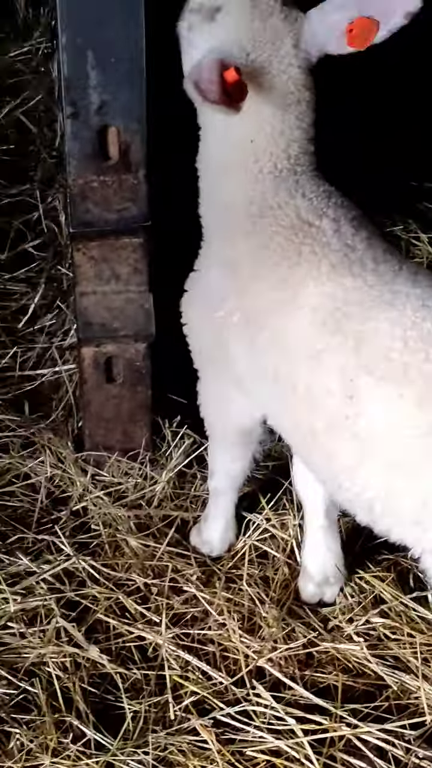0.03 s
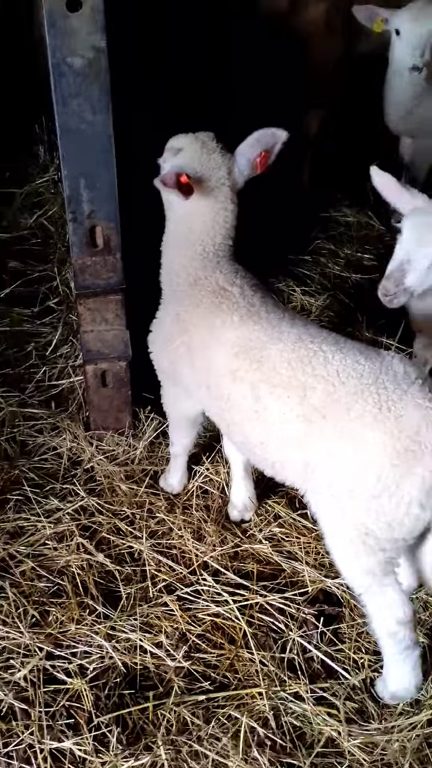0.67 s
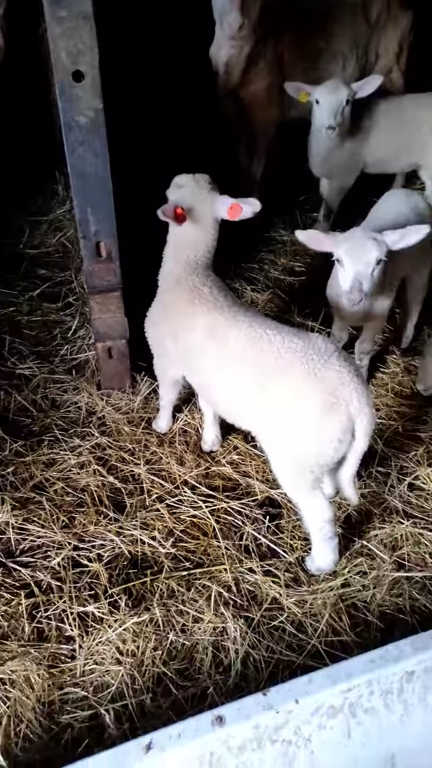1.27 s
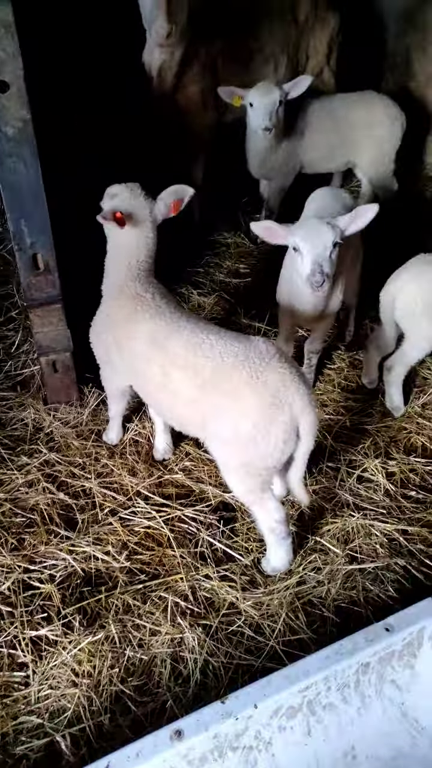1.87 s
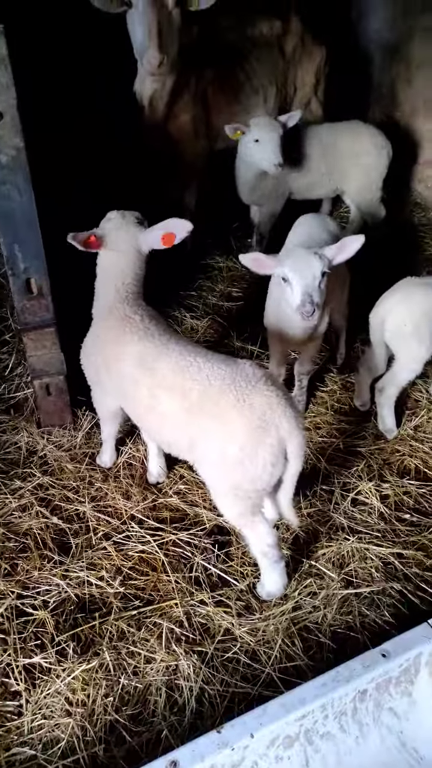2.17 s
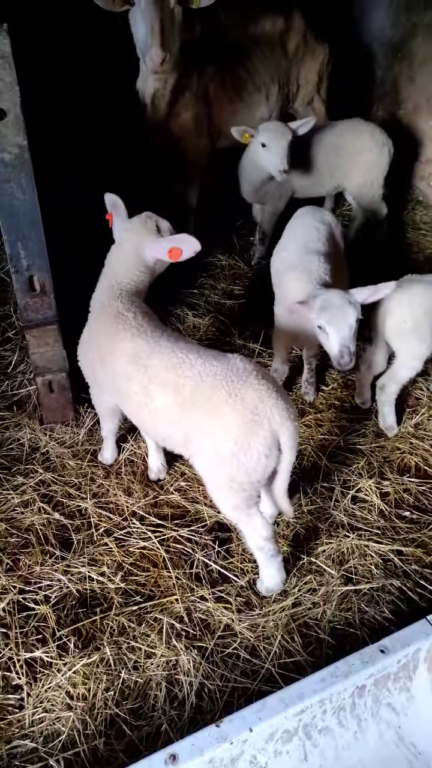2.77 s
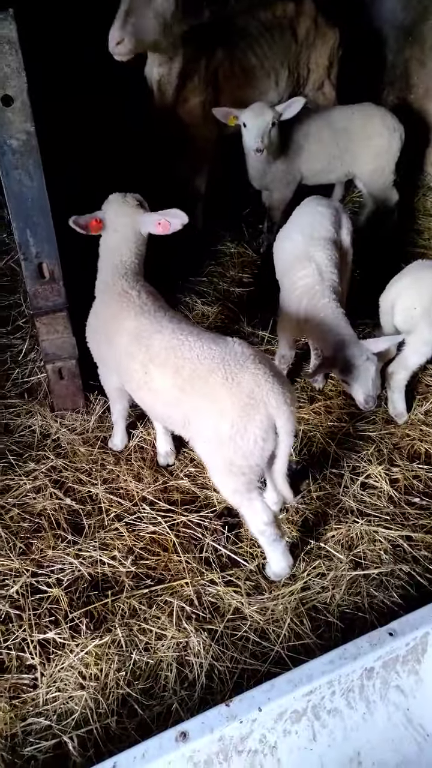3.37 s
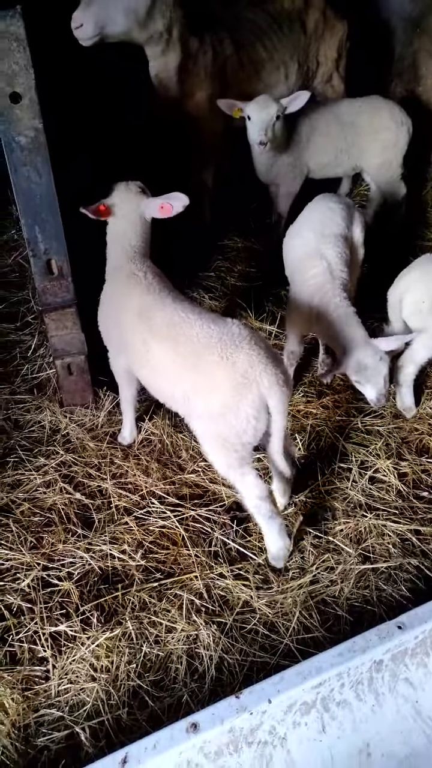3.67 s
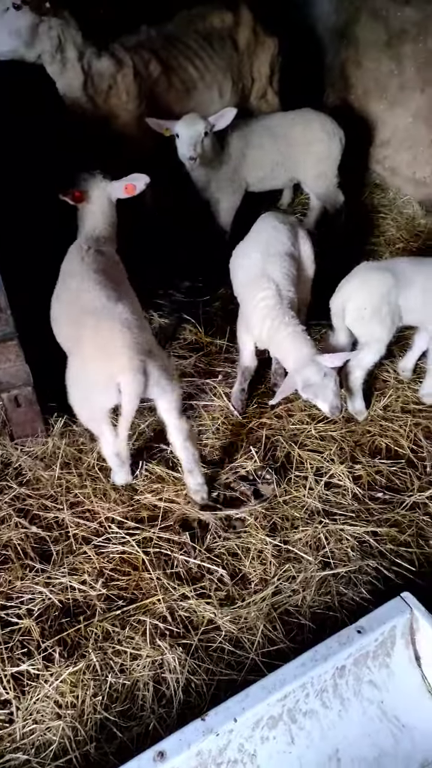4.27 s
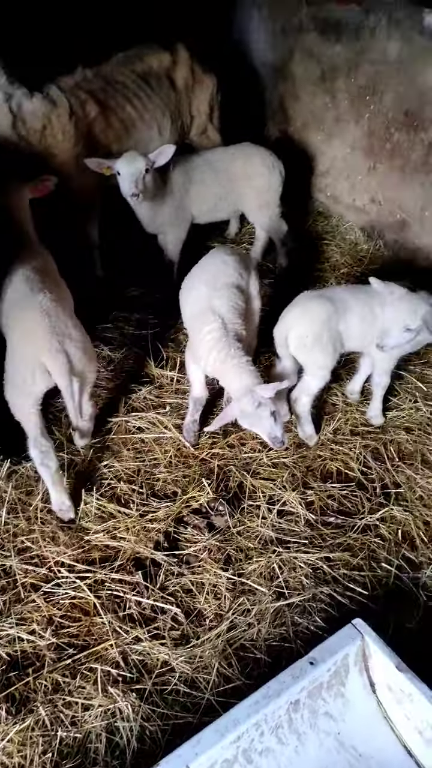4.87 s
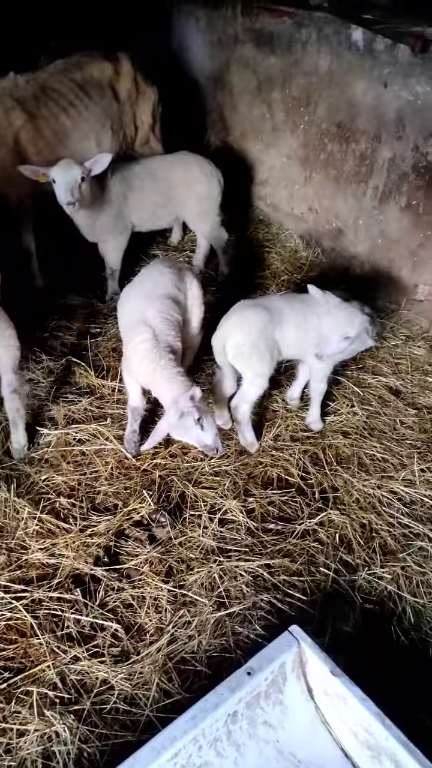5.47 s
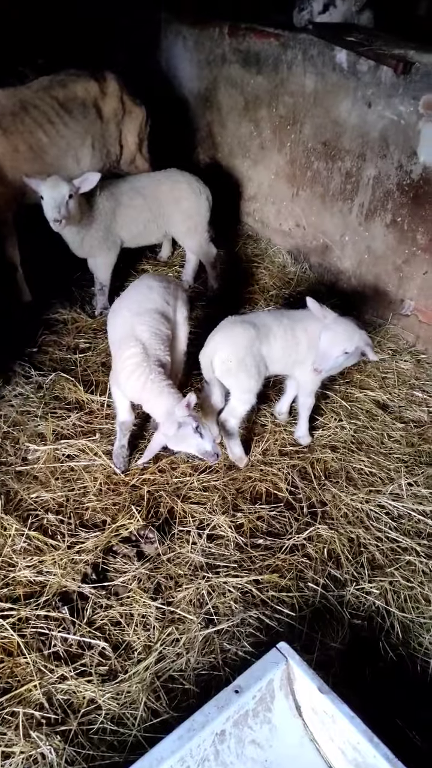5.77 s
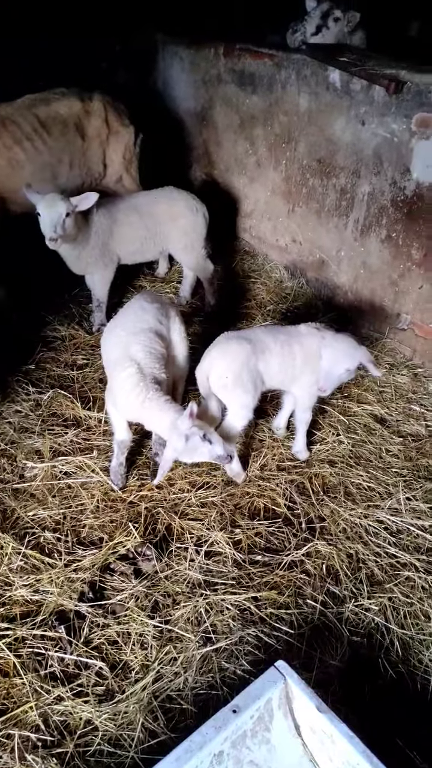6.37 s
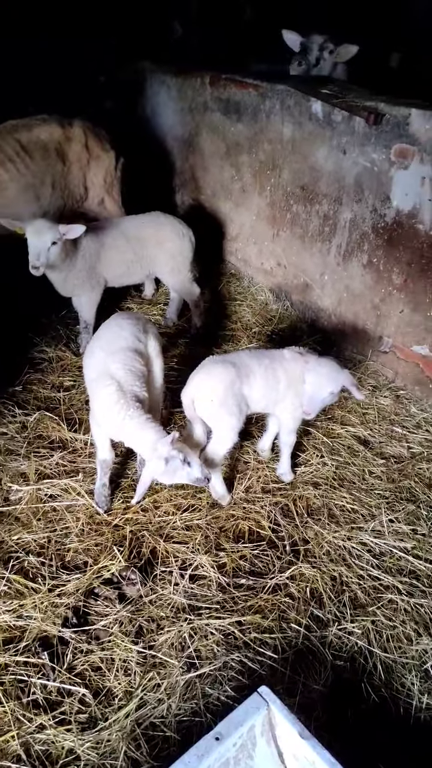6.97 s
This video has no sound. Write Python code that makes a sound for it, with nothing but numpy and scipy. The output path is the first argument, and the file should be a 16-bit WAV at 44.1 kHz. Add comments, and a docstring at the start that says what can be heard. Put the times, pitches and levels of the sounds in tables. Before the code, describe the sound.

In a small, quiet barn, a lamb bleats once near the start, loud and close: a nasal hum opens into a clear, slightly rising cry and ends in a rough catch, with a brief echo off the walls. Afterwards there are only soft hoof thuds, a few dry clicks and faint straw rustling, which grows busier in the second half as the lambs move. A low hush continues throughout, in stereo.

```python
"""A lamb in a small barn

A lamb bleats once: its vocal folds drive a hum through the nose, a clear rising "eh" through the open
mouth, and a last rough catch. Floor, trough and walls reflect the call. Hooves thud softly and straw
rustles as the lambs shift and walk. Two slow swells of breathy hiss and two faint squeaks sound over
the low hush of the barn, all heard in stereo."""
import sys
import numpy as np
from scipy import signal
from scipy.fft import rfft, irfft
from scipy.io import wavfile
from scipy.ndimage import uniform_filter1d

SR = 44100
rng = np.random.default_rng(int(sys.argv[2]) if len(sys.argv) > 2 else 0)


def to_wav(sig):
    """Store sig (one row per channel, or 1-D mono) as 16-bit WAV at the path in sys.argv[1].

    Samples outside -1..1 are clipped; the rate is SR.
    """
    pcm = np.clip(np.atleast_2d(sig), -1, 1) * 32767
    pcm = np.round(pcm).astype(np.int16)
    wavfile.write(sys.argv[1], SR, pcm.T)  # frames by channels


N = 309582
# the bleat: the voice starts, the mouth opens, the voice breaks, the mouth shuts
START_S, OPEN_S, BREAK_S, SHUT_S = 0.799, 0.96, 1.48, 1.512


def gain_of(db):
    """Amplitude ratio of a level in decibels."""
    return 10 ** (np.asarray(db) / 20)


def unit_rms(x):
    """Normalisation to rms 1."""
    return x / np.sqrt(np.mean(x ** 2) + 1e-20)


def steadied(x, size=600):
    """Division by the running rms, which flattens the envelope."""
    power = uniform_filter1d(uniform_filter1d(x ** 2, size), size)
    return x / np.sqrt(abs(power) + 1e-12)


def at_frequency(points, hz):
    """Interpolation of a table on a log-frequency axis."""
    f, value = np.transpose(points)
    return np.interp(np.log(hz + 1), np.log(f + 1), value)


def follow(rows):
    """Linear interpolation of each column in time, one value a sample."""
    s, *columns = np.transpose(rows)
    return [np.interp(np.arange(N) / SR, s, c) for c in columns]


def step(t, s, width_s):
    """Logistic transition from 0 to 1 around time s."""
    return .5 + .5 * np.tanh((t - s) / (2 * width_s))


def add(mix, s, sound):
    """Superposition of a sound on the mix from time s."""
    part = mix[..., round(s * SR):][..., :sound.shape[-1]]
    part += sound[..., :part.shape[-1]]


def colour(x, spectrum, size=4096):
    """Minimum-phase filtering with the given spectrum."""
    log_gain = np.log(gain_of(at_frequency(spectrum, abs(np.fft.fftfreq(size, 1 / SR)))))
    taps = np.fft.ifft(np.exp(np.conj(signal.hilbert(log_gain)))).real[:size // 2]
    return np.apply_along_axis(lambda v: signal.oaconvolve(v, taps)[:N], -1, x)


def wander(rate_hz, size=N):
    """Random modulation: low-pass noise of rms 1."""
    hz = np.fft.rfftfreq(size, 1 / SR)
    return unit_rms(irfft(rfft(rng.standard_normal(size)) / (1 + (hz / rate_hz) ** 4), size))


def hush(still_db=-61, swell_db=1.5, half_swell_at_db=-78.5, waver_db=0.8):
    """A diffuse field, partly coherent only at low frequencies; it swells a little as the lambs move."""
    # barn air: (frequency [Hz], relative density [dB])
    spectrum = [(25, -43), (48, -12.5), (104, -2.5), (160, -1.5), (221, -2.5), (826, -8.5), (1240, -11.5),
                (1620, -12.5), (2850, -20), (4260, -19.5), (7300, -31), (12200, -30.5), (15500, -29.5)]
    # likeness of left and right: (frequency [Hz], coherence [0-1])
    coherence = [(60, 0.4983), (130, 0.27), (300, 0.64), (640, 0.039), (1400, 0.057), (15000, 0)]
    hz = np.fft.rfftfreq(N, 1 / SR)
    left, independent = rfft(rng.standard_normal((2, N)))
    shared = at_frequency(coherence, hz)
    right = shared * left + np.sqrt(1 - shared ** 2) * independent
    air = irfft(np.array([left, right]) * gain_of(at_frequency(spectrum, hz)), N)
    moving = 1 / (1 + gain_of(half_swell_at_db) / stirring())
    return unit_rms(air) * gain_of(still_db + swell_db * moving + waver_db * wander(22.21))


def stirring(rest_db=-77, walk_db=-72.5, walk_from_s=3.7, walk_until_s=7.3):
    """Envelope of the rustle: its steady stir and brief swells are incoherent, so their powers add."""
    # shuffles in the straw and, at 0.934 s, a soft tick of the lips just before the mouth opens:
    # (peak time [s], relative level [dB], half length [s])
    swells = [(0.305, -68.5, 0.081), (0.478, -66.5, 0.035), (0.934, -60, 0.01), (1.807, -68, 0.057),
              (1.996, -67, 0.04), (3.548, -63.5, 0.014), (3.875, -57.5, 0.017), (3.96, -61, 0.055),
              (4.041, -59, 0.03), (4.154, -62, 0.028), (4.24, -62.5, 0.036), (4.53, -61, 0.081),
              (5.126, -66.5, 0.12), (5.277, -62, 0.05477), (5.544, -63.5, 0.045), (5.807, -58.5, 0.12),
              (6.113, -65.5, 0.03524), (6.38, -58.5, 0.09), (6.51, -63.5, 0.033)]
    t = np.arange(N) / SR
    walking = step(t, walk_from_s, 0.056) * (1 - step(t, walk_until_s, 0.0314))
    power = gain_of(rest_db) ** 2 + gain_of(walk_db) ** 2 * walking
    for s, db, half_s in swells:
        width_s = half_s * np.where(t < s, 0.9, 0.8)
        power += gain_of(db) ** 2 / (1 + ((t - s) / width_s) ** 2 / 2) ** 2
    return np.sqrt(power)


def patchy_colour(x, patchy_db=2.5, bins=9, frames=5):
    """Random gains over time and frequency shift the colour of a noise from moment to moment."""
    spectra = signal.stft(x, nperseg=512)[2]
    patches = uniform_filter1d(rng.standard_normal(spectra.shape[1:]), bins, axis=0)
    patches = unit_rms(uniform_filter1d(patches, frames, axis=1))
    return signal.istft(spectra * gain_of(patchy_db * patches), nperseg=512)[1][:, :N]


def straw(gain_db=4, cracks_per_s=700, spread_db=1.1, clump_db=0.5, snap_gain_db=-7):
    """Shot noise of tiny cracks and a fine fizz follow the stirring; single stalks snap."""
    # rustling straw: (frequency [Hz], relative density [dB])
    spectrum = [(880, -33), (1500, -9.5), (2200, -11), (3250, -12.5), (3610, -4.5), (5720, -10.5),
                (6560, -3.5), (7160, -10.5), (8540, -1.5), (11100, -3.5), (12000, 0), (15500, -13)]
    # dry snaps, mostly stalks: (time [s], relative level [dB], 60 dB decay time [s])
    snaps = [(2.431, -44, 0.0038), (2.709, -42.5, 0.0077), (3.53, -50, 0.039), (3.86, -33.5, 0.0097),
             (3.8658, -40, 0.02)]
    # stereo balance: (frequency [Hz], left minus right [dB])
    balance = [(380, 0), (950, 5), (2380, 9), (5980, -5.5), (15000, 8)]
    t = np.arange(SR // 10) / SR
    sizes = gain_of(spread_db * np.minimum(rng.exponential(1, (2, N)), 5))
    signs = rng.choice([-1, 1], (2, N))
    cracks = unit_rms(sizes * signs * (rng.random((2, N)) < cracks_per_s / SR))
    fizz = rng.standard_normal((2, N))
    clumps = unit_rms(cracks + fizz) * gain_of(clump_db * wander(35))
    stalks = patchy_colour(colour(clumps, spectrum))  # each bundle rings at its own pitches
    rustle = unit_rms(stalks) * stirring() * gain_of(gain_db)
    for s, db, t60 in snaps:
        add(rustle, s, gain_of(db + snap_gain_db - 60 * t / t60) * rng.standard_normal((2, len(t))))
    left_db = at_frequency(balance, np.fft.rfftfreq(N, 1 / SR)) / 2
    return irfft(rfft(rustle) * gain_of([left_db, -left_db]), N)


def hooves(rise_s=0.0034, thud_gain_db=-7):
    """Damped impacts: pushes into the bedding give bursts of band noise, knocks one short-lived mode."""
    # soft pushes: (time [s], relative level [dB], band frequency [Hz], decay time constant [s])
    thuds = [(0.125, -51, 220, 0.071), (1.745, -49.5, 430, 0.13), (2.085, -47, 331, 0.051),
             (4.28, -54, 730, 0.048), (4.756, -54, 730, 0.04), (5.98, -50.5, 496.9, 0.032),
             (6.332, -45, 644, 0.024)]
    # dead knocks: (time [s], level [dB], frequency [Hz], 60 dB decay time [s])
    knocks = [(1.694, -32.5, 570, 0.0062), (2.4313, -43, 1110, 0.0061), (2.434, -47.5, 366.3, 0.032)]
    out, t = np.zeros(N), np.arange(SR // 2) / SR
    for s, db, hz, decay_s in thuds:
        band = signal.butter(2, [hz / 2.5, hz * 1.63], "band", fs=SR, output="sos")
        push = unit_rms(signal.sosfilt(band, rng.standard_normal(len(t))))
        envelope = (1 - np.exp(-t / rise_s)) * np.exp(-t / decay_s)
        add(out, s, gain_of(db + thud_gain_db) * envelope * push)
    for s, db, hz, t60 in knocks:
        add(out, s, -gain_of(db - 60 * t / t60) * np.sin(2 * np.pi * hz * t))
    return out


def vocal_effort(t, opened, hum_db=-47, attack_s=0.033, swell_db_per_s=58, release_db_per_s=380):
    """Effort sets the voice's level in dB: a swelling hum, the cry, a last push and a drop at the break."""
    # the open cry, in two surges: (time [s], level [dB])
    surges = [(0.97, -31.5), (1.0, -24), (1.05, -18.2), (1.112, -16.5), (1.135, -23.5), (1.18, -21),
              (1.24, -20.3), (1.31, -17), (1.38, -21.8), (1.43, -23.8), (1.47, -21)]
    age, broken = np.maximum(t - START_S, 0), np.maximum(t - BREAK_S, 0)
    humming_db = hum_db + swell_db_per_s * age + 20 * np.log10(np.clip(age / attack_s, 1e-3, 1))
    push_db = 2.5 * np.exp(-abs(t - BREAK_S) / 0.014)
    drop_db = 7.5 * step(t, BREAK_S, 0.0013) + release_db_per_s * broken
    return (1 - opened) * humming_db + opened * follow(surges)[0] + push_db - drop_db


def voice_quality(t, opened, settle_s=0.11, fray_s=0.018, grunt_s=0.051, quaver_hz=27.4):
    """Uneven fold motion sets roughness (0-1); hardness of closure sets spectral tilt (dB per octave)."""
    # the voice cracks briefly: (time [s], added roughness [0-1], added tilt [dB/octave])
    cracks = [(0.972, 0.36, 1.5), (1.132, 0.24, 3)]
    rough_grunt, rough_cry, rough_break = 0.7, 0.08, 0.5
    age, crying = np.maximum(t - START_S, 0), np.maximum(t - OPEN_S, 0)
    unsettled = np.exp(-(age / settle_s) ** 2)
    frayed = np.exp(np.minimum(t - BREAK_S, 0) / fray_s)
    rough = rough_cry + (rough_grunt - rough_cry) * unsettled + (rough_break - rough_cry) * frayed
    grunt = np.exp(-(age / grunt_s) ** 2)  # the first hard closures
    arch = np.sin(np.pi * np.clip(crying / (BREAK_S - OPEN_S), 0, 1)) ** 2
    tremble = np.cos(2 * np.pi * quaver_hz * crying)
    hum_tilt, cry_tilt = -3, -2 + arch - 1.5 * tremble
    tilt = (1 - opened) * hum_tilt + opened * cry_tilt + 12 * grunt + 3 * frayed
    for s, more_rough, more_tilt in cracks:
        crack = np.exp(-((t - s) / 0.016) ** 2)
        rough += more_rough * crack
        tilt += more_tilt * crack
    return np.clip(rough, 0, 1), tilt


def fold_cycles(t, chaos, jitter=0.071, waver=0.0023, fall_hz=51.9, fall_s=0.0142):
    """Phase in cycles, the integral of a pitch that climbs, jitters when rough and falls at the break."""
    # pitch until the break: (time [s], frequency [Hz])
    pitch = [(0.82, 264), (0.83, 268.7), (0.866, 276.4), (0.888, 297.5), (0.918, 319.3), (0.958, 322.9),
             (0.986, 347.7), (1.03, 355.7), (1.122, 360.4), (1.17, 371.4), (1.28, 374.5), (1.418, 382.4),
             (1.476, 363.9)]
    broken = np.maximum(t - BREAK_S, 0)
    hz = follow(pitch)[0] - fall_hz * (1 - np.exp(-broken / fall_s))
    return np.cumsum(hz * (1 + jitter * chaos * wander(113) + waver * wander(36))) / SR, hz


def harmonics(call, cycles, hz, tilt, mouth, pivot_hz=1300, width_hz=230, flutter_db=3.6, flutter_hz=24):
    """The folds' harmonic series, tilted and lifted by moving formants; each partial flutters alone."""
    # three resonances that drift with jaw and tongue: (time [s], low [Hz], its lift [dB],
    # middle [Hz], its lift [dB], high [Hz], its lift [dB])
    formants = [(0.975, 629.0, 14, 1800, 14, 3770, 11.5), (1.01, 920, 7, 2058.0, 11.0, 3606.0, 11),
                (1.06, 1111, 8, 2550, 10, 3600, 4), (1.115, 1122.0, 10.0, 2740, 5, 4027.0, 3),
                (1.17, 1180, 5.0, 2832.0, 8.5, 3678.0, 11.5), (1.25, 1141.0, 7.5, 2615.0, 2.0, 3880, 10),
                (1.31, 1130, 11, 2423.0, 8, 4050, 6), (1.375, 1110.0, 8.5, 2340, 12.5, 3580, 6.5),
                (1.42, 1220, 10.0, 2290, 6, 3597.0, 8), (1.47, 1040, 12.0, 2498.0, 4.5, 3750, 6.5)]
    tracks = [track[call] for track in follow(formants)]
    treble_hz = 7730 + 4100 * (np.arange(N)[call] / SR - OPEN_S)  # climbs as the mouth widens
    out = np.zeros(N)
    for k in range(1, 41):
        f = k * hz[call]
        db = tilt[call] * np.clip(np.log2(f / pivot_hz), -1, 1)
        for formant_hz, lift_db in zip(tracks[::2], tracks[1::2]):
            db += mouth[call] * lift_db / (1 + ((f - formant_hz) / width_hz) ** 2)
        db += 3.5 / (1 + ((f - treble_hz) / 700) ** 2)
        db += flutter_db * min(k / 10, 1) * wander(flutter_hz, size=len(f))
        out[call] += gain_of(db) * np.cos(2 * np.pi * k * cycles[call])
    return out


def bleat(length_s=0.78, jaw_s=0.004, ajar=0.13, shimmer=0.96, rasp=0.14):
    """Source and filter: vocal-fold pulses leave by the nose, then by the opening mouth."""
    # throat with the mouth open: (frequency [Hz], relative gain [dB])
    throat = [(150, -59), (360, -20), (730, -9), (1085, -3), (1480, -16), (1850, -18.5), (2250, -9),
              (2650, -17.5), (3750, -13.5), (4500, -21.5), (5000, -39), (5400, -32.5), (5900, -37),
              (7100, -36.5), (9400, -32), (11200, -49), (12300, -48), (15000, -56)]
    # nose with the mouth shut: (frequency [Hz], relative gain [dB])
    nose = [(120, -37), (300, -3), (600, -8.5), (950, -15), (1250, -15), (1650, -20.5), (2600, -33.5),
            (3600, -54), (14000, -41)]
    t = np.arange(N) / SR
    call = slice(round(START_S * SR), round((START_S + length_s) * SR))
    opened = step(t, OPEN_S, jaw_s)
    mouth = (ajar + (1 - ajar) * opened) * (1 - step(t, SHUT_S, jaw_s))
    envelope = np.zeros(N)
    envelope[call] = gain_of(vocal_effort(t, opened)[call])
    rough, tilt = voice_quality(t, opened)
    chaos = rough ** 2
    cycles, hz = fold_cycles(t, chaos)
    pulses = steadied(harmonics(call, cycles, hz, tilt, mouth))
    # turbulence at each opening of the folds
    puffs = unit_rms((1 + np.cos(2 * np.pi * cycles)) * rng.standard_normal(N))
    drive = pulses * (1 + shimmer * chaos * wander(110)) + rasp * chaos * puffs
    voice = mouth * steadied(colour(drive, throat)) + (1 - mouth) * steadied(colour(drive, nose))
    return envelope * steadied(voice) * creak(t) + lip_breath(t)


def lip_breath(t, level_db=-48, lead_s=0.001, width_s=0.018):
    """Turbulent air rushes through the parting lips as the hum turns into the cry."""
    # air at the lips: (frequency [Hz], relative density [dB])
    spectrum = [(500, -22), (3700, -13), (4600, -19.5), (5400, -15), (8300, -19), (14000, -32)]
    envelope = np.exp(-((t - OPEN_S + lead_s) / width_s) ** 2 / 2)
    return gain_of(level_db) * envelope * unit_rms(colour(rng.standard_normal(N), spectrum))


def creak(t, rate_hz=88, depth=0.55, onset_s=0.001725):
    """Amplitude modulation: as the voice breaks, the folds catch and let go in uneven jolts."""
    jolts = .5 + .5 * np.cos(2 * np.pi * rate_hz * (t - BREAK_S) + .5 * wander(40))
    return 1 - depth * step(t, BREAK_S, onset_s) * (1 - jolts ** 2)


def early_paths(x, left_late_ms=0.373, gain_db=-3.5):
    """Interference of the direct sound, which arrives first on the right, with the first reflections."""
    # floor, trough and walls, gains relative to the direct sound:
    # (left delay [ms], left gain [dB], right delay [ms], right gain [dB])
    echoes = [(1.045, -6.182, 1.116, -6), (1.167, -8.5, 1.074, -8), (1.53, -5.5, 1.29, -8),
              (3.866, -10.5, 1.656, -7.5), (13.004, -9, 5.177, -11), (12.113, -11, 0.464, -6),
              (7.095, -13.139, 9.711, -10.5)]
    phase_per_ms = -2j * np.pi * np.fft.rfftfreq(N, 1 / SR) / 1000
    left, right = np.exp(phase_per_ms * left_late_ms), np.ones_like(phase_per_ms)
    for left_ms, left_db, right_ms, right_db in echoes:
        left += gain_of(left_db) * np.exp(phase_per_ms * left_ms)
        right += gain_of(right_db) * np.exp(phase_per_ms * right_ms)
    return gain_of(gain_db) * irfft(rfft(x) * np.array([left, right]), N)


def reverberation(x, build_s=0.011):
    """The barn's diffuse tail builds up, then decays exponentially, each band at its own rate."""
    # reverberation time: (frequency [Hz], 60 dB decay time [s])
    t60 = [(200, 0.14), (700, 0.49), (1200, 0.32), (2500, 0.33), (4500, 0.27), (9000, 0.27), (15000, 0.019)]
    hz, t, spectra = signal.stft(rng.standard_normal((2, SR)), SR, nperseg=256)
    envelope = gain_of(-60 * t / at_frequency(t60, hz)[:, None]) * (1 - np.exp(-t / build_s))
    tail = signal.istft(spectra * envelope, SR, nperseg=256)[1]
    return signal.fftconvolve(x[None], tail / np.linalg.norm(tail[0]), axes=1)[:, :N]


def breathy_hiss():
    """Filtered noise: two faint, slow swells of soft, breathy hiss near 2.3 and 4.3 kHz."""
    # slow swells: (peak time [s], level [dB], half length [s])
    swells = [(2.046, -66.5, 0.4), (5.68, -65, 0.26)]
    # soft hiss: (frequency [Hz], relative density [dB])
    spectrum = [(1200, -19), (2300, 1.5), (3200, -14), (4300, -2), (5200, -26)]
    t = np.arange(N) / SR
    envelope = sum(gain_of(db) * np.exp(-((t - s) / half_s) ** 4) for s, db, half_s in swells)
    return envelope * unit_rms(patchy_colour(colour(rng.standard_normal((2, N)), spectrum)))


def squeaks(waver=0.014):
    """Thin whistles from the back of the pen: pure tones under random frequency modulation."""
    # faint whistles: (time [s], level [dB], start pitch [Hz], end pitch [Hz], length [s])
    whistles = [(4.244, -62, 3590, 3590, 0.11), (4.731, -65, 3440, 3610, 0.087)]
    out = np.zeros(N)
    for s, db, start_hz, end_hz, length_s in whistles:
        n = round(length_s * SR)
        hz = np.linspace(start_hz, end_hz, n) * (1 + waver * wander(150, size=n))
        add(out, s, gain_of(db) * np.hanning(n) * np.sin(2 * np.pi * np.cumsum(hz) / SR))
    return out


def scene(call_room_db=-12.5, small_room_db=-9):
    """Superposition of the call, the small sounds and their reverberation on straw, hiss and hush."""
    call, small = bleat(), hooves() + squeaks()
    tail = reverberation(gain_of(call_room_db) * call + gain_of(small_room_db) * small)
    return early_paths(call) + small + tail + straw() + breathy_hiss() + hush()


def record(dry, edge_hz=15600):
    """Band limiting by a linear-phase low-pass filter."""
    taps = signal.firwin(511, edge_hz, window=("kaiser", 9), fs=SR)
    return signal.oaconvolve(dry, taps[None], "same")


dry = scene()
out = record(dry)
to_wav(out)
```